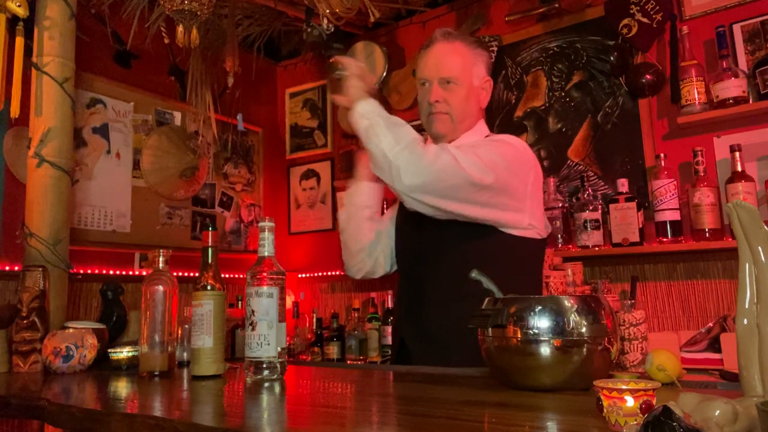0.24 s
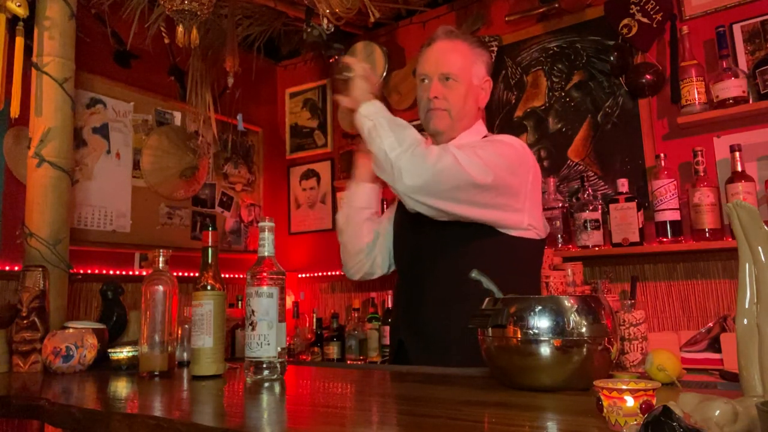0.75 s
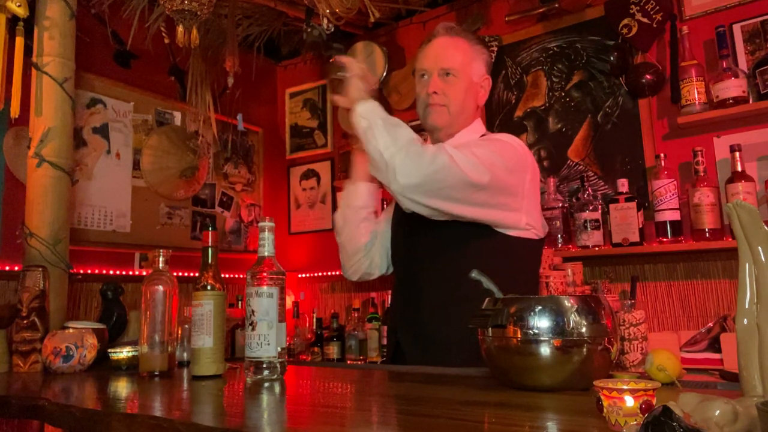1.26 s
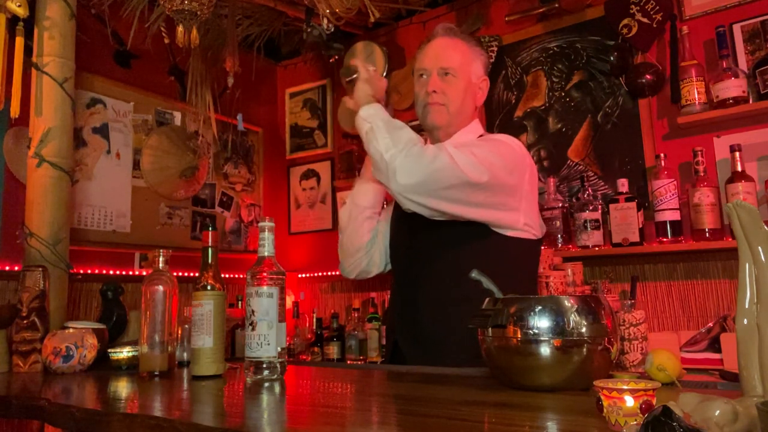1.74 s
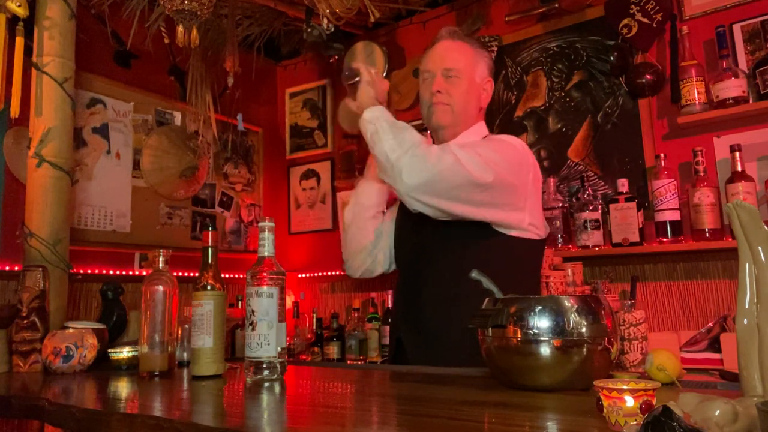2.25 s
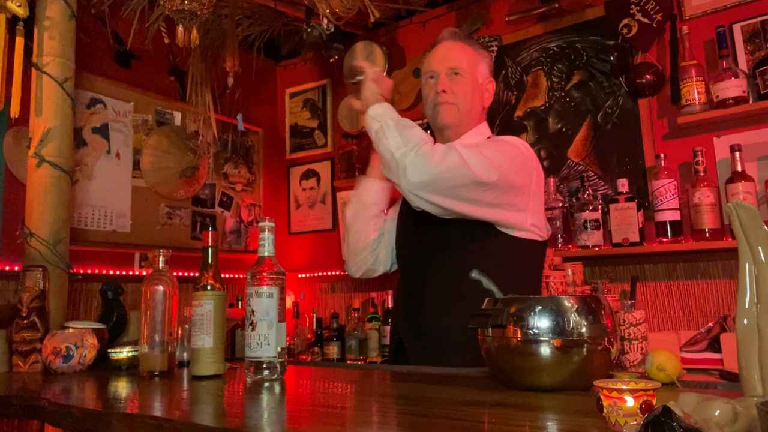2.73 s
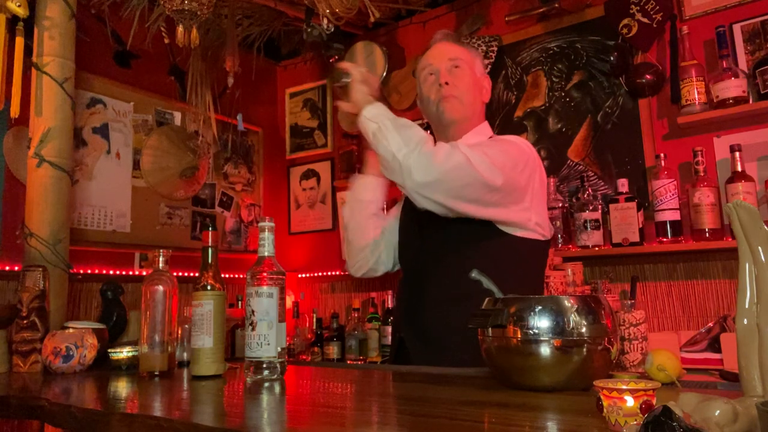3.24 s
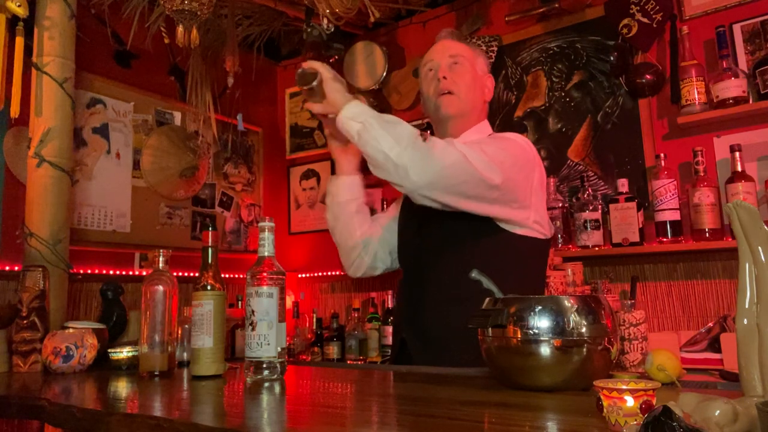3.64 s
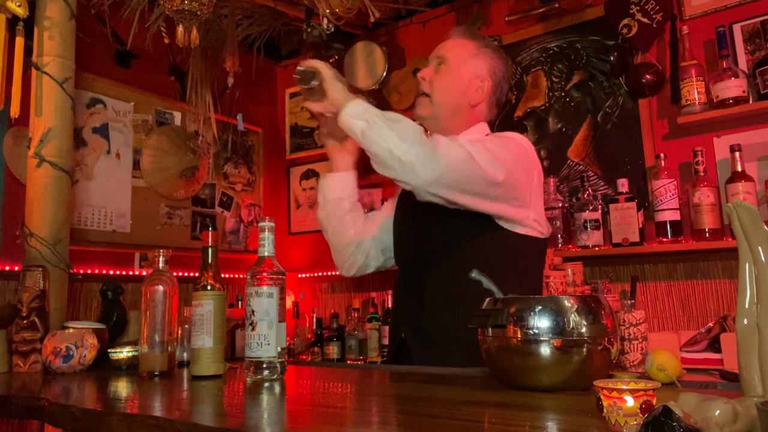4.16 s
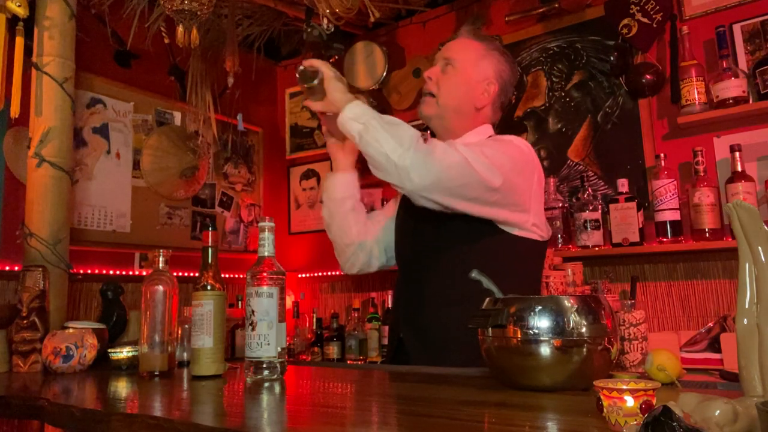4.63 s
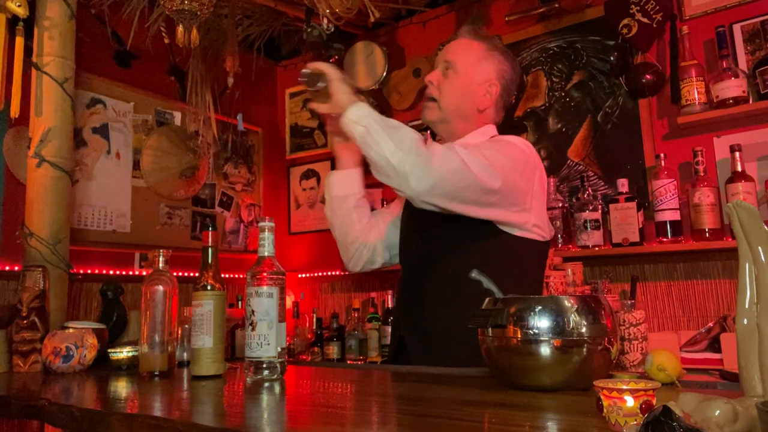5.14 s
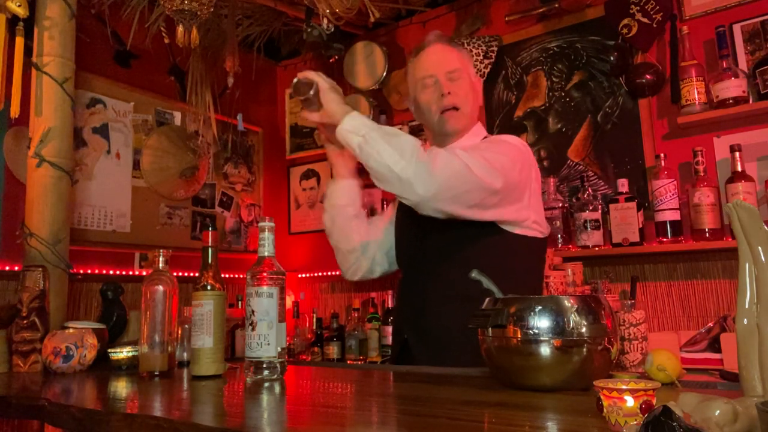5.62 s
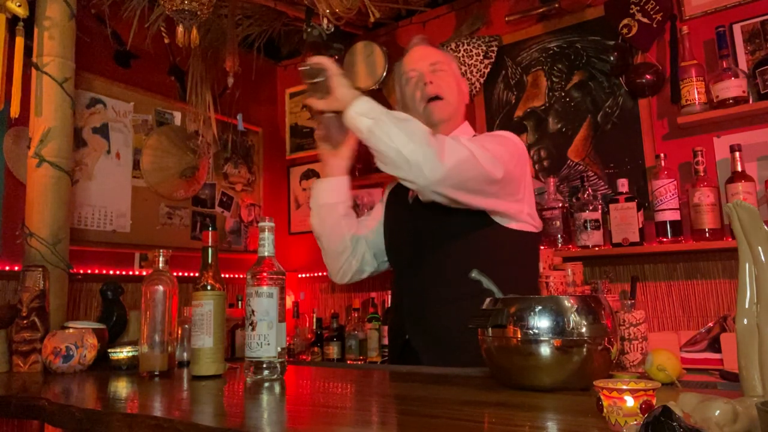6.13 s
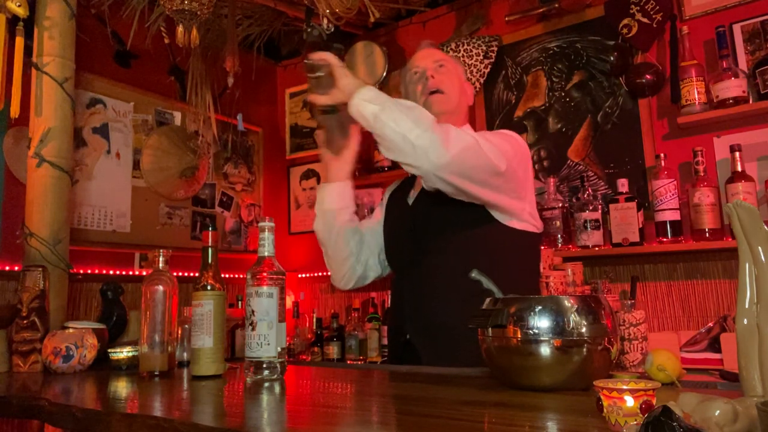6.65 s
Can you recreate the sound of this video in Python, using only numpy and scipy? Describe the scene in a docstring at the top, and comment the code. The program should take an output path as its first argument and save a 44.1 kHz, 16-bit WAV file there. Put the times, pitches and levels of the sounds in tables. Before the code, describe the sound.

Vigorous, unbroken cocktail shaking in a small bar: crisp ice clatter, brief metallic tin rings and wet gurgles pulsing four times a second.

```python
"""In a small furnished bar, ice cubes and liquid are thrown to and fro in a closed metal shaker,
four strokes a second. Cubes knock on the tin and on each other: cracks, short notes and ringing wall modes.
Finer contacts crackle and the liquid gurgles through banks of resonators that follow each stroke.
The microphone is close and sways with every stroke; faint rumble, dull bumps and short echoes surround it."""
import sys
import numpy as np
from scipy import signal
from scipy.io import wavfile

SR = 44100
rng = np.random.default_rng(int(sys.argv[2]) if len(sys.argv) > 2 else 0)


def master_out(mix):
    """Clip the mix to full scale and print it as 16-bit PCM to the path in sys.argv[1]."""
    frames = np.transpose(np.atleast_2d(mix))
    ceiling = np.clip(frames, -1, 1)
    pcm = np.round(ceiling * 32767).astype(np.int16)
    wavfile.write(sys.argv[1], SR, pcm)


N = 303408

# Strokes of the shaker. Each row: forward jerk in seconds, relative level of the rattle in dB as the load lands,
# as it flies free, as it tumbles back, relative level of the liquid's splash on landing in dB.
STROKES = [(-0.12, -32, -7, -32.5, -36), (0.134, -30, -43.5, -33, -33), (0.385, -37, -39, -35.5, -33),
           (0.641, -32.5, -46.5, -33.5, -33), (0.898, -31, -45, -38, -34), (1.159, -30, -48, -35.5, -34),
           (1.423, -32.5, -40.5, -37, -36), (1.686, -33.5, -39.5, -35.5, -33.5),
           (1.941, -39.5, -44.5, -37.5, -34), (2.192, -33.5, -49, -34.5, -34),
           (2.441, -37, -40, -37.5, -36.5), (2.695, -32, -44, -37.5, -32.5),
           (2.962, -36.5, -39, -34.5, -35.5), (3.218, -30.5, -40.5, -37, -34.5),
           (3.47, -36, -37.5, -37, -32.5), (3.709, -36, -43, -40, -33.5), (3.965, -37, -41.5, -40.5, -33),
           (4.227, -34, -45.5, -37, -34), (4.474, -37.5, -48, -36.5, -35.5),
           (4.72, -34, -46.5, -35.5, -33.5), (4.948, -33, -46.5, -38, -32), (5.194, -36, -43.5, -36.5, -35),
           (5.434, -34, -42.5, -35.5, -32), (5.683, -34, -38.5, -44, -35),
           (5.929, -34.5, -42, -39.5, -31.5), (6.178, -34.5, -53, -39, -36),
           (6.432, -31, -50, -39.5, -36.5), (6.685, -32, -45.5, -43, -35.5), (6.935, -35, -43, -42, -35)]


def from_db(db):
    """Decibels to gain."""
    return 10 ** (np.asarray(db) / 20)


def rms_one(x):
    """Scale to unit rms."""
    return x / np.sqrt(np.mean(x ** 2) + 1e-20)


def band_pass(x, order, low_hz, high_hz):
    """Butterworth band-pass."""
    return signal.sosfilt(signal.butter(order, [low_hz, high_hz], "band", fs=SR, output="sos"), x)


def low_pass(x, cut_hz):
    """Second-order Butterworth low-pass."""
    return signal.sosfilt(signal.butter(2, cut_hz, fs=SR, output="sos"), x)


def at_hz(points, hz):
    """Read a spectrum in dB on a log-frequency axis."""
    points_hz, points_db = np.transpose(points)
    return np.interp(np.log(hz), np.log(points_hz), points_db)


def ring(clicks, hz, t60_s):
    """Two-pole resonator: a unit click starts a decaying sine of height about 1."""
    r = from_db(-60 / (t60_s * SR))
    w = 2 * np.pi * hz / SR
    return signal.lfilter([0, np.sin(w)], [1, -2 * r * np.cos(w), r * r], clicks + 1e-18)


def drift(rate_hz):
    """Random wander of unit rms: noise through two equal one-pole low-passes."""
    r = np.exp(-2 * np.pi * rate_hz / SR)
    noise = rng.standard_normal(N + SR)
    return rms_one(signal.lfilter([1], [1, -2 * r, r * r], noise)[SR:])  # first second settles the filter


def contacts(per_s, spread_db, clump_db):
    """Random clicks of uneven size and either sign, in clumps."""
    size_db = spread_db * np.minimum(rng.exponential(1, N), 3.2)
    sizes = from_db(size_db) * rng.choice([-1, 1], N)
    chance = per_s * from_db(clump_db * drift(60)) / SR
    return sizes * (rng.random(N) < chance)


def dealt(clicks, wash, spectrum, cycles, shared, contact_s, count):
    """Clicks become noise scuffs, each fed to some of many log-spaced resonators; a wash of finer rubbing feeds all."""
    out, noise = np.zeros(N), rng.standard_normal(N)
    r = np.exp(-1 / (contact_s * SR))
    for hz in np.geomspace(spectrum[0][0], spectrum[-1][0], count):
        taken = clicks * (rng.random(N) < shared)
        envelope = signal.lfilter([np.sqrt(1 - r * r)], [1, -r], taken + 1e-18)
        scuffs = noise * (wash + envelope)
        gain = from_db(at_hz(spectrum, hz)) * hz / SR
        out += gain * ring(scuffs, hz, cycles / hz)
    return out


def turns():
    """Strokes completed at every moment."""
    jerk_s = np.array(STROKES)[:, 0]
    return np.interp(np.arange(N) / SR, jerk_s, np.arange(len(STROKES)))


def room_tone():
    """A faint low rumble of air and machines: band-passed noise."""
    return from_db(-62) * rms_one(band_pass(rng.standard_normal(N), 1, 90, 260))


def bumps():
    """Short dull thumps near the microphone, each one decaying sine."""
    # Each row: start in seconds, level in dB, pitch in Hz, t60 in seconds.
    thumps = [(2.172, -28.5, 450, 0.09), (2.91, -33, 200, 0.018), (4.324, -24, 130, 0.017),
              (4.859, -32.5, 97.5, 0.039), (6.575, -25.5, 620, 0.027)]
    out = np.zeros(N)
    for start_s, level_db, hz, t60_s in thumps:
        click = np.arange(N) == round(start_s * SR)
        out += ring(from_db(level_db) * click, hz, t60_s)
    return out


def sway():
    """The microphone drifts back slowly and is jerked forward once a stroke: a rounded saw-tooth, with rumble."""
    turn = 2 * np.pi * turns()
    saw = sum(-np.sin(k * turn) * from_db(-6.5 * (k - 2.5)) for k in range(1, 8))
    rumble = low_pass(rng.standard_normal(N), 27.4)
    return from_db(-38) * saw + from_db(-45) * rms_one(rumble)


def bar(x):
    """Dense, dull tails of reflections; the shaker moves, so it feeds a changing mix of them."""
    t60_s, wall_cut_hz = 0.12, 7100
    t = np.arange(SR // 3) / SR
    tails = rng.standard_normal((4, len(t))) * from_db(-60 * t / t60_s) * np.minimum(t / 0.0014, 1)
    tails = signal.lfilter(*signal.butter(1, wall_cut_hz, fs=SR), tails)
    return sum(signal.fftconvolve(x * drift(8.8), tail / np.linalg.norm(tails))[:N] for tail in tails)


def tin(clicks, favoured_hz, picky_db):
    """Wall modes; the place of a blow favours the mode nearest one pitch, others lose picky_db per octave."""
    # Modes of the metal wall. Each row: pitch in Hz, relative level in dB, t60 in seconds.
    modes = [(1152, 0, 0.023), (1530, -9, 0.015), (1630, -8.5, 0.14), (1760, -2, 0.064), (1830, -1, 0.056)]
    out, at = np.zeros(N), np.flatnonzero(clicks)
    for hz, level_db, t60_s in modes:
        octaves_off = np.abs(np.log2(favoured_hz[at] / hz))
        blows = np.zeros(N)
        blows[at] = clicks[at] * from_db(level_db - picky_db * octaves_off)
        out += ring(blows, hz, t60_s)
    return out


def stroke_levels():
    """Each stroke the load lands on one end, flies free, tumbles back and settles: dB of ice and of liquid."""
    _, land_db, fly_db, tumble_db, splash_db = np.transpose(STROKES)
    # lands, landed, flies, tumbles, settles: shares of the stroke's length
    moments = np.arange(len(STROKES))[:, None] + np.array([0.087, 0.13, 0.34, 0.49, 0.87])
    ice_db = np.transpose([land_db, land_db, fly_db, tumble_db, tumble_db - 1.5])
    # between splashes the liquid follows the rattle: -42 dB at a rattle of -36 dB, 0.61 dB per dB
    liquid_db = -42 + 0.61 * (ice_db + 36)
    liquid_db[:, :2] = splash_db[:, None]
    return [np.interp(turns(), moments.ravel(), db.ravel()) for db in (ice_db, liquid_db)]


def load():
    """Small ice contacts crackle, thud and excite the tin; the liquid gurgles in short bubbles."""
    # Spectrum of the ice crackle. Each row: frequency in Hz, relative level in dB.
    ice_spectrum = [(1200, -40), (1900, -4.5), (2600, 5), (4000, -2), (6200, -3.5), (9000, -30),
                    (12100, -54), (16000, -74)]
    # Spectrum of the bubbles. Each row: frequency in Hz, relative level in dB.
    liquid_spectrum = [(110, -22), (200, -12), (340, -42), (460, -32), (800, 17), (1100, 22), (1500, -6)]
    ice_level, liquid_level = from_db(stroke_levels())
    taps = ice_level * rms_one(contacts(600, spread_db=3.5, clump_db=5.5))
    crackle = dealt(taps, from_db(-16.5) * ice_level, ice_spectrum,
                    cycles=16.2, shared=0.26, contact_s=0.0015, count=30)
    rung = tin(taps, rng.uniform(960, 1750, N), picky_db=59)
    thud = band_pass(taps, 1, 130, 236)  # small contacts heard through the full shaker
    bubbles = dealt(contacts(900, spread_db=4.0, clump_db=4.5), from_db(-27), liquid_spectrum,
                    cycles=7.3, shared=0.15, contact_s=0.0016, count=22)
    ice = from_db(5) * crackle + from_db(-20.5) * rung + from_db(6) * thud
    return ice + liquid_level * rms_one(bubbles)


def knocks():
    """A hard knock is a crack, a thud, a short cube note and a blow on the tin."""
    # Loudest knocks. Each row: start in seconds, relative level in dB, cube pitch in Hz,
    # relative level of the blow on the tin in dB, favoured tin pitch in Hz.
    hits = [(0.069, -10, 3700, -29, 1640), (0.1337, -9, 1970, -33, 1640), (0.17, -14, 3070, -38, 1630),
            (0.2046, -7.5, 4100, -41, 1610), (0.2373, -19, 3170, -34, 1800), (0.2555, -8, 3520, -4.5, 1547),
            (0.4291, -7, 4400, -44, 1600), (0.4623, -16, 2190, -31, 1630), (0.4759, -12, 2490, -19.5, 1770),
            (0.5221, -12, 2580, -20, 1830), (0.7329, -6, 2570, -13.5, 1850),
            (0.8113, -14.5, 2940, -40, 1570), (0.8637, -11, 4430, -46, 1820),
            (0.895, -27, 2550, -19.5, 1750), (0.9448, -15, 2940, -31, 1630), (0.987, -8, 2050, -21, 1710),
            (1.056, -19, 2510, -25, 1710), (1.13, -31, 3220, -19, 1720), (1.1434, -9, 2560, -15, 1830),
            (1.1524, -15, 2020, -22, 1860), (1.189, 0, 2350, -27, 1650), (1.3208, -17, 2500, -13, 1510),
            (1.378, -12, 2720, -19.5, 1670), (1.4133, -23, 3080, -25, 1760),
            (1.514, -11.5, 3160, -36, 1790), (1.6477, -11.5, 2670, -24, 1800),
            (1.6801, -26, 2590, -27, 1830), (1.8394, -10, 2030, -40, 1600), (1.981, -23, 2000, -17, 1950),
            (1.996, -6, 2580, -42, 1940), (2.0248, -13, 2530, -20, 1790), (2.1003, -13.5, 2650, -34, 1600),
            (2.203, -15, 3230, -40, 1670), (2.2254, -10, 2230, -33, 1870), (2.282, -14, 2100, -36, 1510),
            (2.2976, -10, 1950, -32, 1950), (2.5005, -14.5, 2530, -45, 1930),
            (2.6328, -10.5, 2740, -20.5, 1630), (2.6962, -13, 2950, -40, 1590),
            (2.7297, -9, 2960, -37, 1500), (2.8392, -21, 2480, -22.5, 1740), (2.878, -9, 3300, -25, 1740),
            (2.9125, -10, 2800, -18, 1660), (3.056, -12.5, 5140, -44, 1810), (3.0903, -5, 2680, -29, 1630),
            (3.2443, -16, 2170, -39, 1690), (3.3606, -13, 2500, -20.5, 1630), (3.477, -30, 2040, -22, 1630),
            (3.5982, -14, 2260, -40, 1660), (3.684, -15.5, 3700, -16.5, 1610),
            (3.713, -8.5, 3130, -23, 1630), (3.857, -14.5, 2590, -38, 1610), (4.1106, -29, 2040, -23, 1760),
            (4.2192, -16.5, 2160, -18, 1630), (4.3813, -10, 2540, -37, 1970),
            (4.4017, -15.5, 2950, -15.5, 1520), (4.4946, -22, 2190, -20, 1700),
            (4.559, -18, 1990, -22, 1670), (4.6409, -13, 2630, -27, 1830), (4.7247, -12, 3340, -21, 1620),
            (4.751, -22, 3220, -38, 1640), (4.822, -19, 3470, -24.5, 1810),
            (4.8554, -25, 2510, -21.5, 1630), (4.9425, -15, 2770, -23, 1630),
            (5.052, -16.5, 2020, -23.5, 1840), (5.122, -14.5, 3730, -27, 1760),
            (5.2192, -2.5, 2730, -26, 1610), (5.2794, -4, 6400, -17.5, 1820), (5.301, -12, 3300, -21, 1730),
            (5.462, -17, 2830, -19, 1530), (5.607, -26, 2050, -16.5, 1606), (5.69, -10.5, 3100, -34, 1790),
            (5.7269, -10, 2150, -41, 1600), (5.734, -12, 2620, -35, 1630), (5.7673, -15.5, 2480, -32, 1950),
            (5.8179, -14, 2480, -18, 1660), (5.948, -7, 4400, -22, 1630), (6.0121, -7.5, 5960, -39, 1620),
            (6.0457, -16, 6100, -42, 1760), (6.075, -15, 2750, -15.5, 1680), (6.118, -13, 3100, -18, 1530),
            (6.1327, -9.5, 2650, -25, 1750), (6.1919, -10, 2820, -19.5, 1740),
            (6.2159, -4.5, 2580, -26, 1590), (6.236, -13.5, 2600, -28, 1630),
            (6.3115, -12, 3000, -20, 1510), (6.458, -4.5, 2970, -18, 1530), (6.558, -13.5, 2650, -52, 1680),
            (6.583, -9.5, 2550, -44, 1710), (6.6758, -13, 2820, -42, 1640), (6.7124, -15, 3200, -25, 1560),
            (6.8594, -11, 2950, -45, 1890)]
    out, blows, favoured_hz = np.zeros(N), np.zeros(N), np.ones(N)
    t = np.arange(1024) / SR
    crack_decay = (from_db(-10 - 60 * t / 0.0022)
                   + from_db(-22 - 60 * t / 0.0028)
                   + from_db(-14.5 - 60 * t / 0.034))
    for start_s, level_db, cube_hz, tin_db, tin_hz in hits:
        i = round(start_s * SR)
        noise = rng.standard_normal(len(t))
        noise = np.sign(noise) * np.sqrt(np.abs(noise))  # evened, so that every crack has its edge
        note = np.sin(2 * np.pi * cube_hz * t) * from_db(-60 * t * cube_hz / 14)  # 60 dB down in 14 cycles
        knock = from_db(-6.5) * note + noise * crack_decay
        out[i:i + len(t)] += from_db(level_db) * knock[:N - i]
        blows[i], favoured_hz[i] = from_db(tin_db), tin_hz
    thud = band_pass(out, 1, 120, 700)
    clack = band_pass(out, 2, 900, 7500)
    return clack + from_db(0.5) * thud + from_db(-2.5) * tin(blows, favoured_hz, picky_db=112)


def scene():
    """The shaker, its echo in the bar and the swaying microphone."""
    full = knocks() + load()
    split_hz = 450
    above = signal.sosfilt(signal.butter(3, split_hz, "high", fs=SR, output="sos"), full)
    below = signal.sosfilt(signal.butter(3, split_hz, "low", fs=SR, output="sos"), full)
    shaker = from_db(1.5) * above + from_db(-12) * below  # a small body radiates little bass
    echo = from_db(-13.5) * bar(shaker)
    return (shaker + echo + sway() + bumps() + room_tone())[None]


def record(dry):
    """The microphone rolls off in the treble and the top is cut."""
    mic_top_hz, cutoff_hz = 11000, 16500
    dull = low_pass(dry, mic_top_hz)
    return signal.sosfilt(signal.cheby2(18, 60, cutoff_hz, fs=SR, output="sos"), dull)


dry = scene()
out = record(dry)
master_out(out)
```